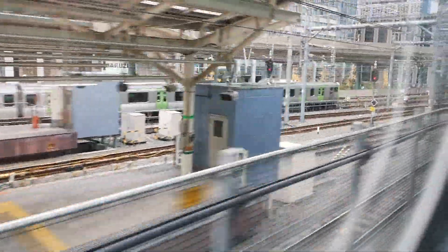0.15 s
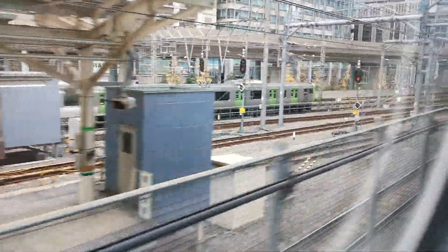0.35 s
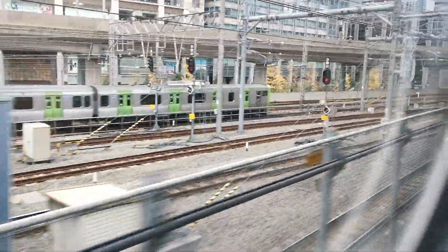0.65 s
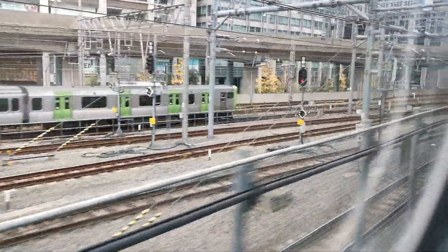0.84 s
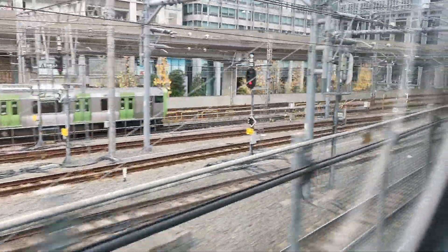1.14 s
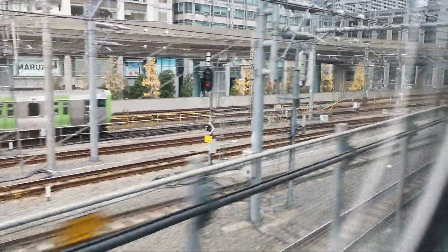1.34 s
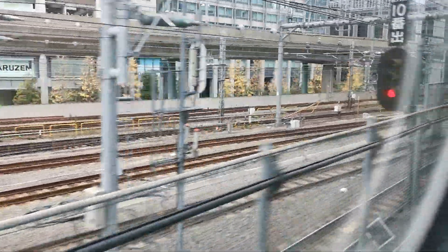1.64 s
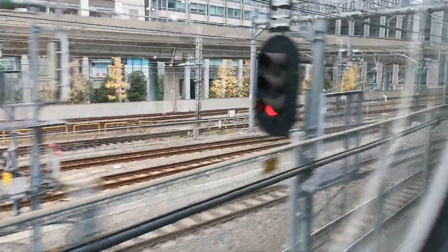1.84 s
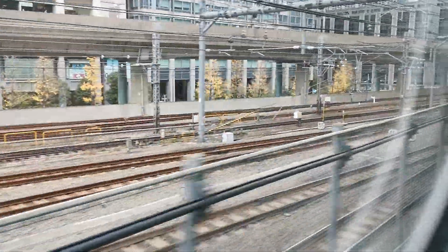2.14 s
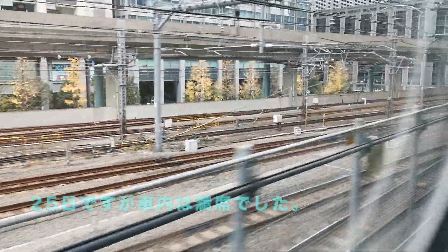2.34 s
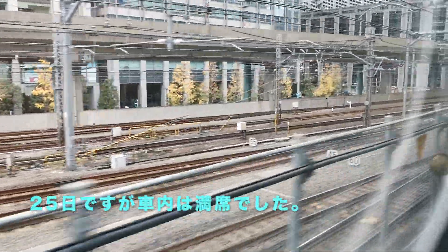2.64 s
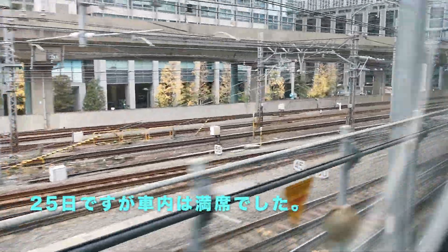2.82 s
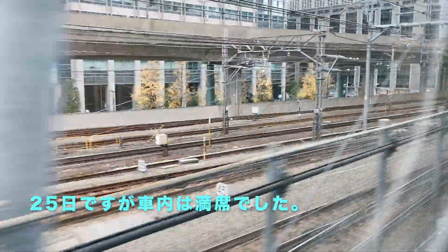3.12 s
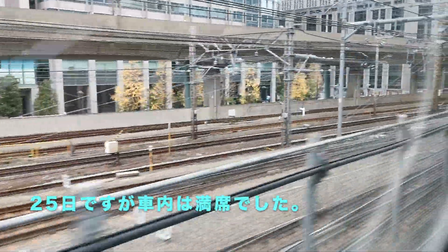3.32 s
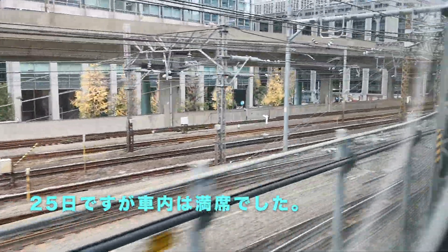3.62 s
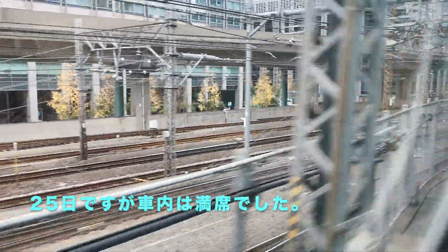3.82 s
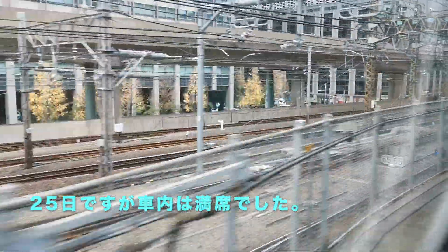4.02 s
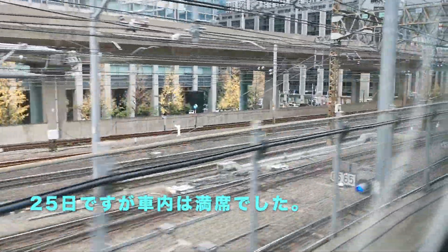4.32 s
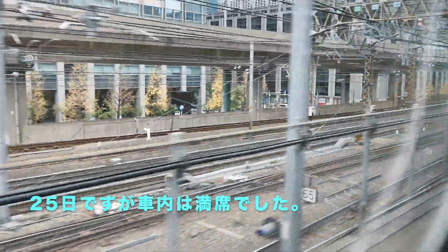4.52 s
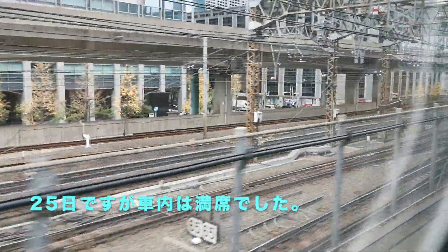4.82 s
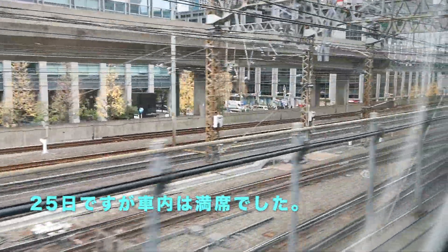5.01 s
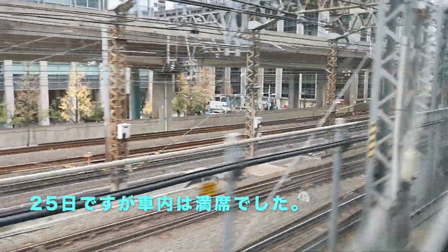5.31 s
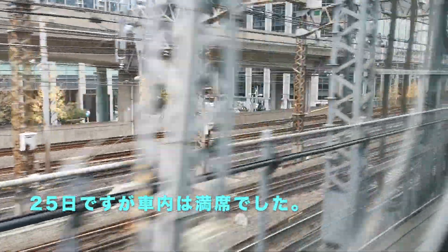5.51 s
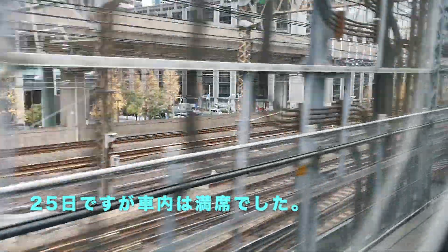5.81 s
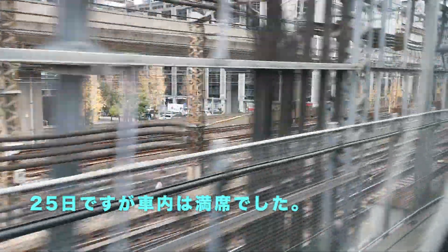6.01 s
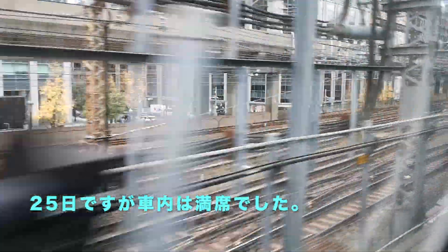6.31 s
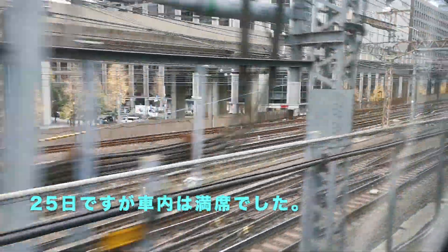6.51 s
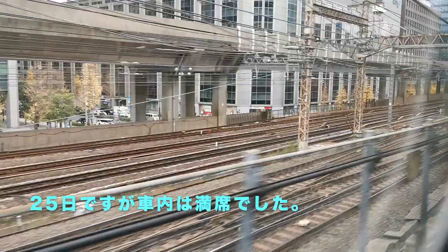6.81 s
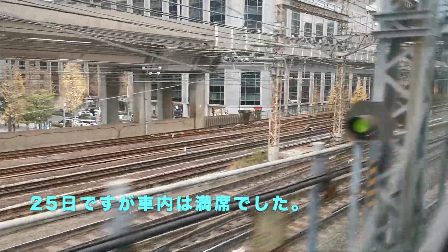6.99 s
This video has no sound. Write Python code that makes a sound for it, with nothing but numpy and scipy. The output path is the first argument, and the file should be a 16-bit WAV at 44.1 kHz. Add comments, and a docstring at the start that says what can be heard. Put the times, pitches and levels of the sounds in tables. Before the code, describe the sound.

Inside a train rolling through a yard, with a phone held near the window. Low, uneven rumble and soft airy hiss last all seven seconds, swelling slightly with the track. Crisp sleeve rustle begins at once, close and bright, in short strokes through the first second; it returns strongest at 1.8 and 2.3 s, fading by 3 s to faint shifting. Muffled joint thumps fall at 0.15-0.2, 2.1-2.2, 2.7, 3.6 and 4.2 s. Heavy crossings of points give clusters of quick thuds with boom and dull clatter at 3.1-3.3 s and 5.1-5.3 s, the first strongest in thud, the second boomier; a weaker cluster comes at 6.5 s. Small ticks appear from 1.3 s, with clacks at 3.3, 3.9 and 5.9 s. Fittings buzz briefly at 3.3, 5.2, 5.9 and 6.2 s. A deep bump at 5.55 s accompanies a thin, very faint high squeak until 5.8 s.

```python
"""Inside a train rolling out through a station yard, heard from a phone held at the window.
From the start filtered noise makes rumble and hiss, and clicks and noise make a sleeve rustle close by.
Joints thump from 0.15 s and three crossings of points from 3.1 s: decaying modes, boom and clatter.
Fittings tick from 1.3 s (noise bursts) and buzz from 3.3 s (rough tones); a thin tone squeaks at 5.5 s.
The phone's two ports colour the treble differently."""
import sys
import numpy as np
from scipy import signal
from scipy.fft import rfft, irfft
from scipy.io import wavfile
from scipy.ndimage import uniform_filter1d

SR = 44100
rng = np.random.default_rng(int(sys.argv[2]) if len(sys.argv) > 2 else 0)


def inscribe(sig):
    """Save sig as 16-bit PCM at rate SR to the path in sys.argv[1].

    A 1-D sig is mono; a 2-D sig holds one channel per row.
    Samples are clipped to [-1, 1] before scaling.
    """
    pcm = np.round(np.clip(np.atleast_2d(sig).T, -1, 1) * 32767)
    wavfile.write(sys.argv[1], SR, pcm.astype(np.int16))


N = 315315
TIME = np.arange(N) / SR
FREQS = np.maximum(np.fft.rfftfreq(N, 1 / SR), 1)
OPPOSITE = np.array([[1], [-1]])  # signs of a left-right difference


def undb(db):
    """Decibels to gain."""
    return 10 ** (np.asarray(db) / 20)


def unit(x):
    """Scale to rms 1."""
    return x / np.sqrt(np.mean(x ** 2))


def curves(rows):
    """Each column of a table of (time_s, ..) rows, sample by sample."""
    time_s, *columns = np.transpose(rows)
    return [np.interp(TIME, time_s, column) for column in columns]


def colour(x, points):
    """Causal minimum-phase filter with the response of (frequency_hz, level_db) points."""
    hz, db = np.transpose(points)
    level_db = np.interp(np.log(FREQS), np.log(hz), db)
    cepstrum = irfft(np.log(undb(level_db)), N)
    # folding the cepstrum forward makes the response causal
    cepstrum[1:N // 2] *= 2
    cepstrum[N // 2:] = 0
    response = irfft(np.exp(rfft(cepstrum)), N)[None, :N // 20]
    return signal.fftconvolve(np.atleast_2d(x), response)[:, :N]


def walk(rate):
    """Smooth random wander of rms 1, with about `rate` new values a second."""
    k = max(int(SR / rate), 1)
    steps = np.repeat(rng.standard_normal(N // k + 1), k)
    return unit(uniform_filter1d(steps, k)[:N])


def noise(side_db):
    """Stereo noise with a given share that differs between left and right."""
    mid, side = rng.standard_normal((2, N))
    return mid + undb(side_db) * side * OPPOSITE


def fade(start, t60, rise):
    """Envelope of a blow: it builds up, then dies by 60 dB in t60 seconds."""
    age = np.maximum(TIME - start, 0)
    tenfolds = np.minimum(np.log10(1000) * age / t60, 20)
    return (1 - np.exp(-age / rise)) * 10 ** -tenfolds


def ring(start, hz, t60, rise):
    """One mode set ringing at a given moment."""
    return fade(start, t60, rise) * np.sin(2 * np.pi * hz * (TIME - start))


def strike(times, gains, response):
    """Play the first second of a response once for each blow."""
    pushes = np.zeros(N)
    np.add.at(pushes, (times * SR).astype(int), gains)
    return signal.fftconvolve(pushes, response[:SR])[:N]


# Roughness of the track under the car: time_s, roughness_db
TRACK = [(0, -2), (.35, 1.2), (1.0, -.3), (1.5, -1.8), (1.85, .7), (2.45, -1.3), (3.0, 0), (3.4, 2),
         (3.8, .5), (4.0, -2), (4.25, 1), (4.95, -1.5), (5.5, 1.5), (6.15, -2), (6.7, 1.8), (7.15, 0)]
# Spectrum of the car heaving on its springs: frequency_hz, relative density_db (per Hz)
HEAVE = [(8, -10), (18, -0.5), (28, -3), (38, -8.5), (56, 1.5), (76, -4), (95, -2.5), (125, -17),
         (250, -71)]
# Spectrum of wheel noise through the floor: frequency_hz, relative density_db (per Hz)
FLOOR = [(60, -29), (100, 1.5), (130, 3.5), (168, -2.2), (235, 0.5), (285, -8.5), (325, -13), (390, -23.5),
         (438, -15), (500, -22), (660, -22.5), (950, -35.5), (2000, -65)]
HEAVE_DB, FLOOR_DB = -36.7, -36  # at a track roughness of 0 dB
SHAKE_DB, SHAKE_T60_S = -13, .5  # the floor shakes on after a thud; dB relative to the thud


def rumble():
    """Rough rails heave the car and shake its floor; wheel load keeps shifting and thuds stir the floor."""
    rough_db, = curves(TRACK)
    times, thud_db, *_ = blows()
    stirred = strike(times, undb(thud_db + SHAKE_DB), fade(0, SHAKE_T60_S, rise=.01))
    heave_gain = undb(HEAVE_DB + rough_db + .7 * walk(9))
    heave = unit(colour(noise(side_db=-14.5), HEAVE)) * heave_gain
    rolling = undb(FLOOR_DB + rough_db + .7 * walk(14))
    floor = unit(colour(noise(side_db=-21), FLOOR)) * np.hypot(rolling, stirred)
    return heave + floor


# Spectrum of steady air and rolling hiss in the cabin: frequency_hz, relative density_db (per Hz)
AIR = [(100, 3.5), (400, 1.5), (750, 5.5), (1000, -3.5), (1600, -3), (2100, -10), (3000, -10), (4200, -19),
       (7800, -21), (15000, -28)]


def cabin_air():
    """Hiss of ventilation and rolling; the ports hear long waves alike and short ones apart."""
    mid, side = rng.standard_normal((2, N))
    side = colour(side, [(300, -18), (650, -14), (1000, -7), (1600, -6), (2400, -0.5), (4000, -3.5)])
    hiss = unit(colour(mid + side * OPPOSITE, AIR))
    return hiss * undb(-49 + 0.15 * walk(5.04))


def stroke(peak, swell, die):
    """Speed of one stroke: it gathers, peaks and dies away, 20 dB in each given time."""
    tenfolds = np.maximum((peak - TIME) / swell, (TIME - peak) / die)
    return 10 ** -np.clip(tenfolds, 0, 10)


# Spectrum of the cloth's rustle close to the phone: frequency_hz, relative density_db (per Hz)
RUSTLE = [(600, -32), (1650, -14), (1980, -0.5), (2250, -2.5), (2650, 6.5), (3050, -1), (3550, -0.5),
          (4250, 2.5), (4750, -1.5), (5500, 2), (6200, 0), (7400, 1.5), (10000, -0.5), (15000, -2)]
# Strokes of the sleeve: peak_s (full speed), speed_db, swell_s (rise by 20 dB), die_s (fall by 20 dB),
# hollow_db (note of the hand's hollow relative to the stroke's speed)
STROKES = [(.005, -43, .03, .06, -20), (.135, -52, .12, .1, -20), (.195, -44.5, .07, .05, -20),
           (.25, -44.5, .05, .05, -20), (.365, -44, .2, .5, -30), (.5, -46.5, .1, .3, -24),
           (.61, -44.5, .1, .4, -26), (.86, -52, .1, .2, -3), (.99, -46.5, .1, .2, -12),
           (1.17, -56, .15, .9, -22), (1.72, -52, .27, .2, -3), (1.83, -38.5, .13, .22, -17),
           (1.94, -44.5, .06, .24, -15), (2.17, -45, .13, .25, -17), (2.295, -34.5, .19, .15, -22),
           (2.42, -45, .25, .33, -14), (2.58, -47.5, .14, .07, -9), (2.73, -44, .06, .18, -11),
           (2.785, -48, .06, .05, -8), (3.76, -58, .1, .15, -12), (4.1, -55.5, .45, .7, -14),
           (4.39, -56.5, .25, .12, -12), (4.8, -59.5, .05, .12, -20), (5.13, -55, .16, .3, -16),
           (5.6, -60, .3, .9, -26), (5.87, -57, .4, .45, -26), (6.62, -57.5, .12, .3, -10),
           (6.82, -53, .45, .28, -16)]
CREEP_DB, CREEP_SPREAD_DB = -65.5, 3  # the cloth also shifts slightly all the time
STICK_DB = -61.5  # below this speed the cloth sticks and its rustle falls silent
HOLLOW_HZ, HOLLOW_WIDTH_HZ = 2680, 300


def sleeve():
    """Catching fibres give dense tiny clicks in uneven spurts; strokes also sound the hand's hollow."""
    rub_power = undb(CREEP_DB + CREEP_SPREAD_DB * walk(16)) ** 2
    hollow_power = 0
    for peak, db, swell, die, hollow_db in STROKES:
        speed = undb(db) * stroke(peak, swell, die)
        rub_power = rub_power + speed ** 2
        hollow_power = hollow_power + (speed * undb(hollow_db)) ** 2
    sizes = undb(3.5 * np.minimum(rng.exponential(size=(2, N)), 4))
    caught = rng.random((2, N)) < 2500 / SR  # 2500 slips a second on average
    slips = caught * rng.standard_normal((2, N)) * sizes
    rustle = unit(colour(unit(noise(side_db=1)) + 0.77 * unit(slips), RUSTLE))
    resonance = 1 / (1 + 1j * (FREQS - HOLLOW_HZ) / HOLLOW_WIDTH_HZ) ** 2
    hollow = unit(irfft(rfft(slips) * resonance, N))
    sliding = np.sqrt(np.maximum(rub_power - undb(STICK_DB) ** 2, 0))
    cloth = rustle * sliding * undb(2.8) + hollow * np.sqrt(hollow_power)
    return cloth * undb(1.7 * walk(90))


# Single bumps at rail joints: start_s, thud_db, boom_db, clatter_db, hardness (dB per octave)
JOINTS = [(.149, -23.5, -29, -44, 16), (.22, -28, -20.5, -40.5, 14), (1.315, -40, -45, -37, 8),
          (2.09, -32, -25, -55, 0), (2.214, -22.5, -26, -47, 11), (2.712, -30, -31, -44, 5),
          (3.55, -21, -30, -50, 0), (3.663, -23, -32, -55, 8), (4.235, -23.5, -28, -55, 7),
          (5.545, -25, -16, -58, 3), (5.632, -43, -24, -58, 0), (5.716, -43, -26.5, -60, 0)]
# A bogie runs over a set of points: start_s, thud_db, boom_db, clatter_db, hardness (dB per octave)
POINTS = [(3.063, -9.3, -22, -36.5, 0), (5.078, -11.3, -14.8, -43.5, 1), (6.524, -24, -33, -37, 2)]
# Blows within every such crossing, added to its row: two axles each drop and land, then the car settles:
# delay_s, thud_db, boom_db, clatter_db, hardness (dB per octave)
CROSSING = [(0, -4, -15, -.5, 0), (.0215, -1, -13, -5, 0), (.082, -11, -10, -13, 2),
            (.146, -4.5, -14, -4.5, 3), (.182, -7.5, -9, -5, 5), (.232, -15, 0, -7, 7)]


def blows():
    """Every blow of the wheels: the same run of them at each set of points, single ones at the joints."""
    crossings = [np.add(points, CROSSING) for points in POINTS]
    return np.vstack(crossings + [JOINTS]).T


# Ringing of the car body: pitch_hz, level_db (relative to the thud), t60_s
BODY = [(99, -14.5, 0.15), (129.5, 3.3, .16), (148.4, -1.5, .16), (172, -8, .12), (188.2, -16.5, 0.28),
        (227.5, -11, 0.11), (339, -27, 0.14), (437, -28, 0.091)]
# Spectrum of wheel clatter as the floor lets it through: frequency_hz, relative density_db (per Hz)
CLATTER = [(150, -21), (330, -1), (480, 0.5), (650, -3.5), (850, -15), (1300, -21.5), (3000, -47)]
HARD_TOP_HZ = 230  # the effect of hardness stops growing here


def thumps():
    """Blows ring the panels, the higher ones more when hard, and the cabin's air; the wheel clatters on."""
    times, thud_db, boom_db, clatter_db, hardness = blows()
    main_hz = BODY[1][0]
    panels = 0
    for hz, db, t60 in BODY:
        octaves = np.log2(min(hz, HARD_TOP_HZ) / main_hz)
        gains = undb(thud_db + db + hardness * octaves)
        panels = panels + strike(times, gains, ring(0, hz, t60, rise=0.0061))
    boom = strike(times, undb(boom_db), ring(0, hz=54.7, t60=0.26, rise=.006))
    clatter_gain = strike(times, undb(clatter_db), fade(0, t60=0.23, rise=0.01))
    clatter = unit(colour(noise(side_db=-21), CLATTER)) * clatter_gain
    return panels + boom + clatter


# Small ticks and clacks of cabin fittings: start_s, level_db (before fading), t60_s,
# brightness (dB per octave)
TICKS = [(1.322, -47.5, .2, -4.5), (1.927, -31, .012, 9), (2.718, -32.5, 0.031, -6),
         (2.938, -44, 0.035, 7.5), (3.199, -42.5, 0.024, 12), (3.239, -46, 0.15, 1),
         (3.306, -31.5, 0.043, -6), (3.370, -49, 0.091, 4), (3.625, -47, .1, 2.5), (3.671, -44.5, .04, -1),
         (3.904, -31, 0.02, 3.5), (4.043, -42, .03, 7), (4.408, -44, .035, 1), (4.917, -42, 0.08, -1),
         (5.087, -48, 0.24, -5.5), (5.902, -32.5, 0.049, -3.5), (5.913, -37.5, 0.18, -3.5),
         (5.956, -46, 0.35, -3), (6.188, -41, 0.2, -7.5), (6.243, -38, 0.13, -4), (6.596, -45, 0.073, -1),
         (6.974, -39.5, .06, -7.5)]
# Spectrum of those ticks before brightness: frequency_hz, relative density_db (per Hz)
TICK = [(200, -34), (500, -14), (850, 0), (1200, -9.5), (1800, -4), (2400, 7), (3100, -1), (4000, -3.5),
        (7200, -5.5), (10000, -13.5), (15000, -17.5)]


def ticks():
    """Fittings tap each other: short cracks, duller when the contact is soft."""
    crack = rfft(colour(noise(side_db=-4), TICK))
    octaves = np.log2(np.maximum(FREQS, 700) / 3000)
    out = 0
    for start, db, t60, tilt_db in TICKS:
        burst = unit(irfft(crack * undb(tilt_db * octaves), N))
        out = out + undb(db) * burst * fade(start, t60, rise=.0004)
    return out


# Loose fittings that buzz briefly when jolted: start_s, pitch_hz, level_db (before fading), t60_s,
# scatter (rms pitch wander as a share)
RINGS = [(3.305, 2700, -30, .035, .13), (3.303, 520, -30, 0.045, 0.202), (5.184, 960, -24.5, 0.074, 0.048),
         (5.188, 1500, -34, 0.089, 0.158), (5.199, 1600, -35, .15, 0.084), (5.193, 1950, -35, 0.073, .14),
         (5.210, 2350, -39, 0.082, .08), (5.901, 7200, -29, 0.031, 0.0207), (5.914, 7450, -41, 0.1, 0.036),
         (5.906, 870, -37, 0.12, .3), (6.199, 2150, -41, .1, .14), (6.250, 2000, -42, .08, .1)]


def rings():
    """Jolted fittings chatter against their seats, so their short tones are rough."""
    out = 0
    for start, hz, db, t60, scatter in RINGS:
        pitch_hz = hz * (1 + scatter * walk(900))
        tone = np.sin(2 * np.pi * np.cumsum(pitch_hz) / SR)
        out = out + undb(db) * fade(start, t60, rise=0.0032) * tone
    return out * (1 + 0.24 * walk(350))


# One thin squeak, its mean course: time_s, pitch_hz, level_db
SQUEAK = [(5.53, 3690, -68), (5.595, 3735, -52), (5.622, 3725, -52), (5.643, 3830, -48), (5.68, 3810, -53),
          (5.70, 3760, -62), (5.75, 3770, -62), (5.81, 3800, -71)]


def squeak():
    """A sliding contact sings on one slightly unsteady pitch."""
    hz, db = curves(SQUEAK)
    sounding = (TIME > SQUEAK[0][0]) & (TIME < SQUEAK[-1][0])
    pitch_hz = hz * (1 + 0.005 * walk(250))
    tone = np.sin(2 * np.pi * np.cumsum(pitch_hz) / SR)
    return sounding * undb(db + 1.5 * walk(90)) * tone


LEFT_LAG_S = .00014


def scene():
    """Sound reaches the right port a moment before the left."""
    left, right = rumble() + cabin_air() + sleeve() + thumps() + ticks() + rings() + squeak()
    left = irfft(rfft(left) * np.exp(-2j * np.pi * FREQS * LEFT_LAG_S), N)
    return np.array([left, right])


# Response of the phone's two microphone ports: frequency_hz, left_db, right_db
PORTS = [(70, 1.5, 2), (393, 0, 2), (742, -1.5, -1), (1100, -4, 3), (1560, -7, 2.5), (1960, -5.5, -3.5),
         (2860, -1.5, -2.5), (3700, -6.5, -1), (5880, -16.5, 5), (6270, -18, 2.5), (7810, -17, 12.5),
         (8760, -23.5, 2.5), (11380, -31.5, -11.5), (15000, -38, -12)]
TOP_HZ = 15300  # the phone passes nothing much above this


def record(dry):
    """Each port adds its own resonances; the phone cuts the top."""
    hz, *port_db = np.transpose(PORTS)
    heard = np.vstack([colour(x, np.transpose([hz, db])) for x, db in zip(dry, port_db)])
    top_cut = signal.ellip(10, .2, 80, TOP_HZ, fs=SR, output="sos")
    return signal.sosfilt(top_cut, heard)


dry = scene()
out = record(dry)
inscribe(out)
```